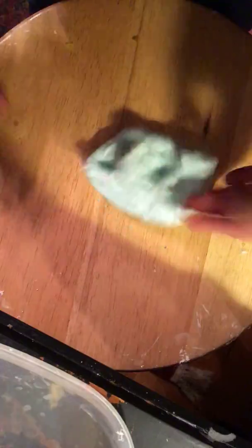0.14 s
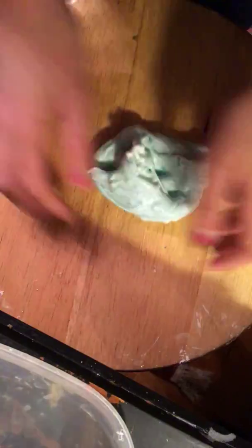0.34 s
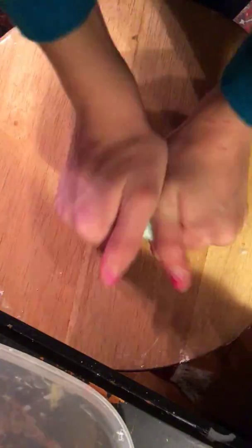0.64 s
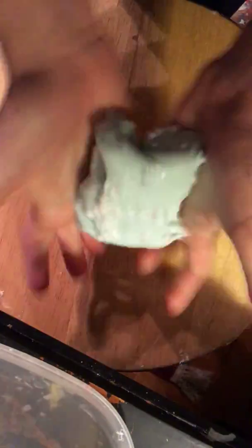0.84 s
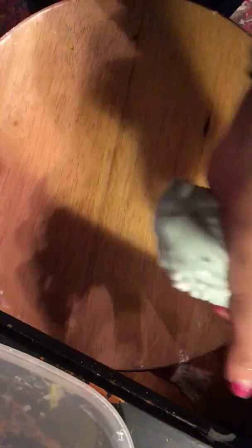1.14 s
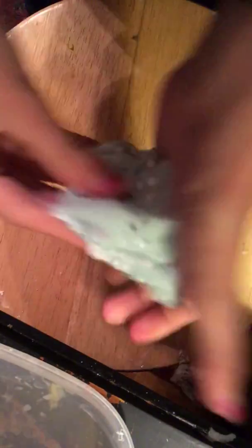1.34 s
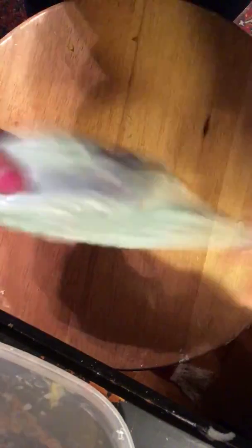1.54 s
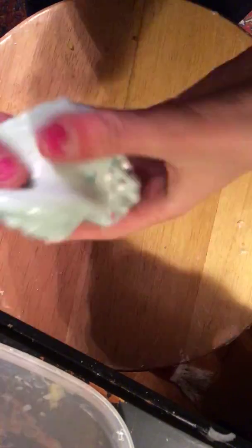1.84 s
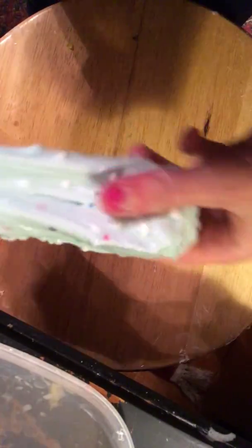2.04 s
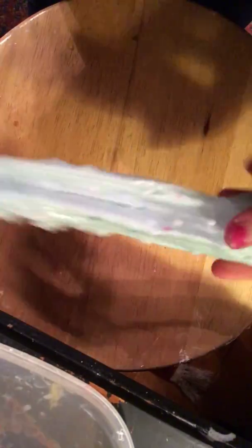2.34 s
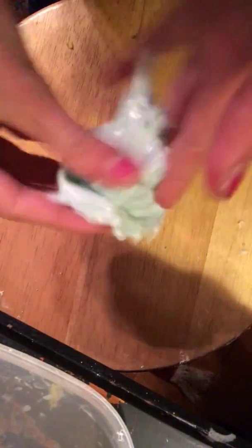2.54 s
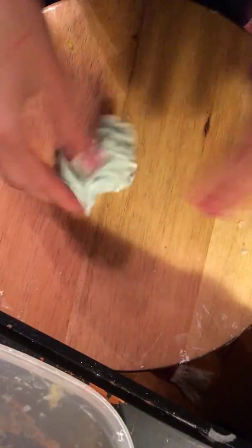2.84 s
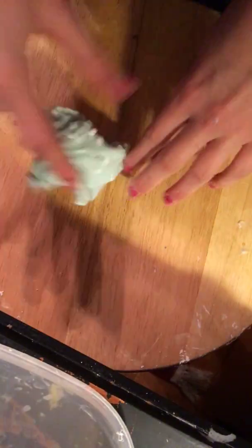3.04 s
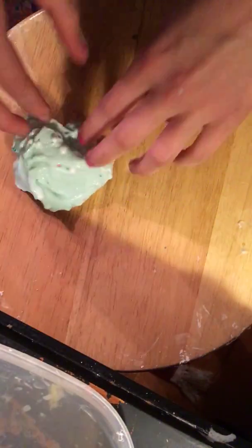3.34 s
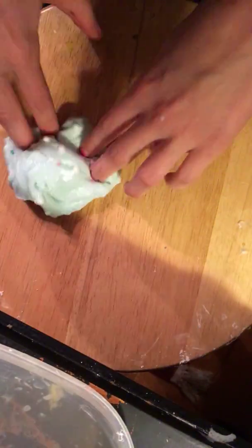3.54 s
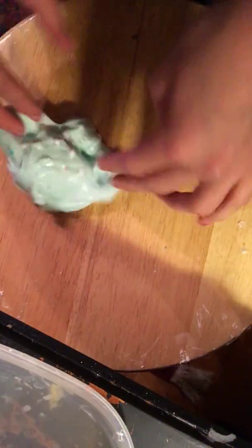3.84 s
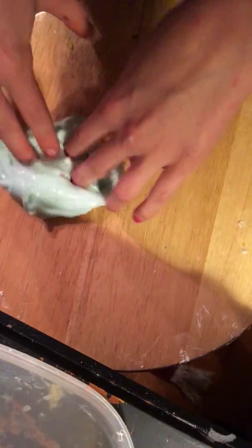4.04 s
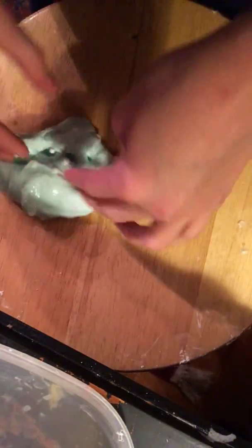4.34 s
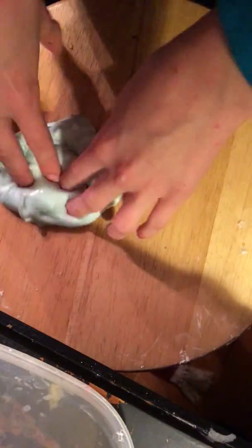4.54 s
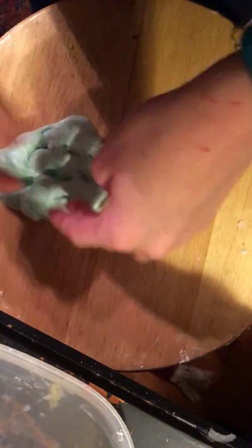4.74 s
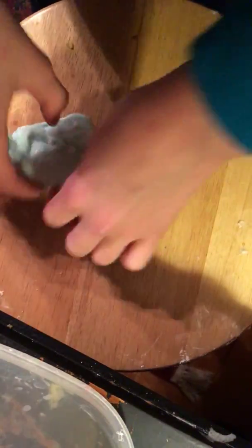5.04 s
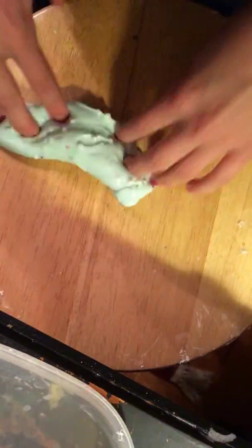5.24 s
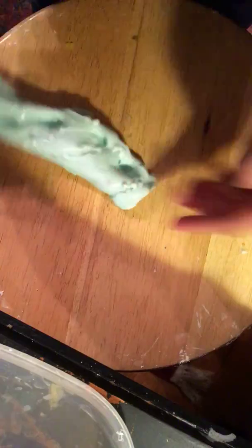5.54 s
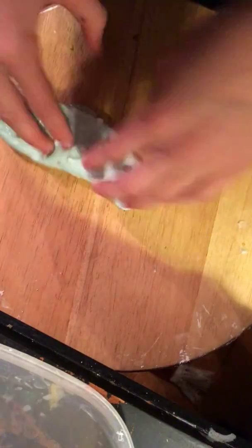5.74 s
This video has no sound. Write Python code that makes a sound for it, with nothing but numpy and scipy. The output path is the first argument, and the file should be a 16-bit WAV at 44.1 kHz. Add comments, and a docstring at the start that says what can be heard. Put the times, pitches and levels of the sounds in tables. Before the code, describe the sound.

Wet, sticky slime is kneaded by hand on a wooden board, with sharp bubble pops, crackles, soft squelches and dull thumps in a quiet room.

```python
"""Bright wet pops and sticky crackle come first, then squishes, rubs and thumps on wood in a quiet room.
Wet slime with beads is kneaded on a wooden table top under a phone microphone.
Trapped air bursts as filtered noise bursts; wet holes ring as sagging sines; peeling skin clicks and fizzes.
Pressing hands, fingertips and wet holes shake a sum of table modes.
Behind lie a noise hush, faint wavering tones, flutters of stirred air and the room's answer."""
import sys
import numpy as np
from scipy import signal
from scipy.fft import rfft, irfft, next_fast_len
from scipy.io import wavfile
from scipy.ndimage import map_coordinates

SR = 44100
rng = np.random.default_rng(int(sys.argv[2]) if len(sys.argv) > 2 else 0)


def bounce(signal):
    """Save signal as a 16-bit WAV file at the path given by the first command-line argument."""
    frames = np.transpose(np.atleast_2d(signal))
    limited = np.clip(frames, -1, 1)
    pcm = np.round(limited * 32767).astype(np.int16)
    wavfile.write(sys.argv[1], SR, pcm)


def ratio_of_db(decibels):
    """Turn decibels (scalar or array-like) into linear amplitude factors; 0 dB maps to 1."""
    return 10 ** (np.asarray(decibels, float) / 20)


N = 260441  # samples


def unit(x):
    """Scaled to rms 1."""
    return x / np.sqrt(np.mean(x ** 2) + 1e-20)


def noise():
    """White noise over the whole scene."""
    return rng.standard_normal(N)


def along(points, hz):
    """(freq_hz, value) points read on a log frequency axis."""
    f, v = np.transpose(points)
    return np.interp(np.log(hz + 1), np.log(f + 1), v)


def filtered(x, response):
    """x shaped by a (complex) response of frequency in Hz."""
    m = next_fast_len(len(x) + 8192)
    return irfft(rfft(x, m) * response(np.fft.rfftfreq(m, 1 / SR)), m)[:len(x)]


def coloured(x, spectrum):
    """x given a spectrum of (freq_hz, gain_db) points, rms 1."""
    return unit(filtered(x, lambda f: ratio_of_db(along(spectrum, f))))


def resonance(f, hz, width_hz):
    """A causal resonance of peak gain 1."""
    return 1j * f * width_hz / (hz * hz - f * f + 1j * f * width_hz)


def wobble(knots_per_s):
    """A smooth random curve."""
    return map_coordinates(rng.standard_normal(N // 100), [np.arange(N) * knots_per_s / SR])


def grainy(per_s, spread_db, grain_db, grain_ms):
    """Noise with short random spurts of very uneven size on it, rms 1."""
    chance, size = rng.random((2, N))
    starts = (chance < per_s / SR) * ratio_of_db(-spread_db * np.log(size + 0.037))
    envelope = signal.lfilter([1], [1, -np.exp(-1000 / (grain_ms * SR))], starts)
    spurts = envelope * noise()
    return unit(noise() + ratio_of_db(grain_db) * unit(spurts))


def bubbles(count, hz, cycles, spread_db):
    """Tiny pockets of air shifting in the mass: scattered damped tones a few cycles long, rms 1."""
    when, size = rng.random((2, count, 1))
    pitch_hz = hz * np.exp(0.524 * rng.standard_normal((count, 1)))
    k = np.arange(SR // 40)
    phase = pitch_hz * k / SR  # in cycles
    envelope = np.exp(-phase / cycles) * (1 - np.exp(-phase))
    grains = ratio_of_db(-spread_db * np.log(size + 0.0043)) * envelope * np.sin(2 * np.pi * phase)
    places = (when * N).astype(int) + k
    return unit(np.bincount(places.ravel(), grains.ravel())[:N])


def swells(peak_s, db, rise_s, fade_s):
    """Gain of overlapping gestures, each gaining 20 dB over its rise and losing 20 dB over its fade."""
    t, power = np.arange(0, N + 64, 32) / SR, 0
    for s, level_db, up_s, down_s in np.broadcast(peak_s, db, rise_s, fade_s):
        drop_db = 20 * np.maximum((s - t) / up_s, (t - s) / down_s)
        power = power + ratio_of_db(level_db - drop_db) ** 2
    return np.interp(np.arange(N) / SR, t, np.sqrt(power))


def add_at(out, start_s, sound):
    """Adds a sound to out from a given time."""
    out[round(start_s * SR):][:len(sound)] += sound


# room noise spectrum, relative: freq_hz, gain_db
HUSH_SPECTRUM = [(18, -24), (30, -7.5), (70, 2), (118, -1.5), (171, -21), (235, -4.5), (467, -14.5),
                 (904, -20.5), (1240, -18.5), (2050, -22.5), (7670, -30.5), (8310, -28.5), (12000, -31),
                 (15000, -31), (16500, -30.5), (18000, -64.5)]


def hush():
    """Room hush: noise of fixed colour and slightly wavering level."""
    level_db = -66
    return ratio_of_db(level_db + 0.61 * wobble(12)) * coloured(noise(), HUSH_SPECTRUM)


# faint wavering tones elsewhere in the room, before a shared waver in level:
# start_s, length_s, pitch_hz, level_db
TONES = [(1.21, .06, 1280, -68), (1.75, .08, 5750, -66), (1.75, .08, 3340, -67), (1.8, .1, 2800, -73),
         (1.23, .13, 780, -66), (2.22, .06, 1070, -72), (4.06, .07, 2550, -69), (2.04, .14, 1290, -69),
         (2.26, .13, 1310, -66), (3.56, .12, 1260, -69), (5.46, .07, 4700, -73), (5.84, .065, 6900, -69)]


def tones():
    """Short faint tones that swell, waver, fade and sag a little."""
    out = np.zeros(N + SR)
    for start_s, length_s, hz, db in TONES:
        t = np.arange(round(length_s * SR)) / SR
        drift = np.cumsum(rng.standard_normal(len(t))) * (.07 + hz / 120000)  # the higher, the rougher
        tone = np.sin(2 * np.pi * hz * t * (1 - 0.142 * t) + drift)
        add_at(out, start_s, ratio_of_db(db) * np.sin(np.pi * t / length_s) * tone)
    return out[:N] * ratio_of_db(3.5 * wobble(45))


# air stirred by the hands sweeping past the microphone: peak_s, level_db, fade_s
WAFTS = [(.32, -55, 0.29), (2.2, -62, 0.082), (2.65, -62, 0.062), (3.06, -56, 0.13)]


def wafts():
    """Brief deep flutters of moving air: noise through a low resonance applied twice."""
    hz, width_hz = 61.4, 42
    peak_s, db, fade_s = np.transpose(WAFTS)
    flutter = unit(filtered(noise(), lambda f: resonance(f, hz, width_hz) ** 2))
    return swells(peak_s, db, 0.33 * fade_s, fade_s) * flutter


# reverberation: freq_hz, t60_s
ROOM_DECAY = [(200, 0.19), (1500, 0.46), (6000, 0.017), (15000, 0.032)]


def room(x):
    """Each frequency of the room's answer dies at its own speed; every fifth of a second gets a new tail."""
    out, step = np.zeros(N + 2 * SR), SR // 5
    for start in range(0, N, step):
        hz, t, z = signal.stft(rng.standard_normal(SR // 3), SR, nperseg=256)
        decay = ratio_of_db(-60 * t / along(ROOM_DECAY, hz)[:, None])
        tail = signal.istft(z * decay, SR, nperseg=256)[1]
        wet = signal.fftconvolve(x[start:start + step], tail / np.linalg.norm(tail))
        out[start + SR // 200:][:len(wet)] += wet  # 5 ms later
    return out[:N]


# modes of the wooden top: freq_hz, width_hz, mid_board_db, near_rim_db
TABLE_MODES = [(135, 36, -1, -10), (203, 11, 8, -2), (259, 22, 1, -4), (329, 22, -14, 9),
               (385, 60, -13, -3), (600, 750, -27, -21), (731, 34, -23.5, -8.5), (1044, 110, -35.5, -23.5),
               (1410, 47, -20, -35), (1741, 26, -37, -16)]


def table_top(f, rim):
    """Sum of the modes of the wooden top, pressed between mid-board (0) and rim (1)."""
    total = 0
    for k, (hz, width_hz, mid_db, rim_db) in enumerate(TABLE_MODES):
        gain = ratio_of_db(mid_db + rim * (rim_db - mid_db))
        total = total + (-1) ** k * gain * resonance(f, hz, width_hz)
    return total


# steady work of the hands between gestures: time_s, effort_db, rim_share (0-1)
EFFORT = [(0.0, -57, 0.96), (.38, -69, 0), (.76, -71.5, 0.11), (1.2, -65, 0.27), (1.5, -64, 0.08),
          (1.75, -66, 0.1), (2.4, -71.5, 0.2), (2.8, -78, 0.1), (3.33, -65, 0.15), (3.42, -56, 0.26),
          (3.83, -57, 0.4), (4.2, -54.5, 0.32), (4.31, -52.5, 0.67), (4.5, -51.5, 0.9), (4.78, -51, 0.63),
          (4.98, -60, 0.11), (5.2, -62, 0.4), (5.45, -67.5, 0.19), (5.9, -66, 0.37)]


def effort():
    """Steady effort in dB and the share of the pressure near the table rim, per sample."""
    s, *columns = np.transpose(EFFORT)
    return [np.interp(np.arange(N) / SR, s, c) for c in columns]


# skin sliding on wood, relative spectrum: freq_hz, gain_db
RUB_SPECTRUM = [(880, -39), (1500, -2), (2320, -3.5), (2820, -5.5), (4580, -2.5), (6800, -9), (9000, -9),
                (11700, -49.5), (19800, -120)]
# slides: peak_s, hiss_db, fade_s
RUBS = [(0.254, -50, 0.13), (.92, -57.5, 0.056), (1.82, -68.5, 0.32), (4.09, -65.5, 0.066),
        (4.145, -66, 0.042), (4.194, -54.5, 0.022), (4.23, -63, .05), (4.28, -59, 0.074),
        (4.35, -69, 0.061), (4.43, -57, 0.11), (4.68, -66.5, 0.1), (4.84, -58, 0.092),
        (5.615, -59.5, 0.091), (5.89, -64.5, 0.059)]


def sliding():
    """Palms rub the wood: grainy coloured hiss, over a faint one that follows the effort."""
    rest_re_effort_db = -22
    peak_s, db, fade_s = np.transpose(RUBS)
    gain = np.hypot(ratio_of_db(effort()[0] + rest_re_effort_db), swells(peak_s, db, fade_s, fade_s))
    return gain * coloured(grainy(110, 3.2, 2.07, 8.0), RUB_SPECTRUM)


# pushes into the mass, also played by squishing(): peak_s, pressure_db, squish_re_pressure_db, fade_s
KNEADS = [(.13, -64, 7.5, 0.15), (0.248, -44, -5.5, 0.12), (.55, -60.5, -9.5, 0.47), (.92, -63.5, -5, 0.33),
          (1.48, -59, -18, 0.062), (1.68, -61.5, -26, 0.2), (1.82, -55.5, -8, 0.2), (2.55, -62, -12, 0.28),
          (3.031, -52, -19, 0.34), (3.4, -63, 4, 0.049), (3.61, -70, 5.5, 0.17), (3.862, -53.5, -8.5, 0.12),
          (4.01, -56.5, -26, .15), (4.12, -49, -29, 0.11), (4.21, -48, -13, 0.14), (4.389, -50.5, -2, 0.14),
          (4.759, -42, -13, 0.016), (4.84, -60.5, 8.5, 0.083), (4.948, -42.5, -21, 0.062),
          (5.06, -52.5, -34, 0.046), (5.178, -47.5, -22, 0.054), (5.3, -57, -36.5, 0.13),
          (5.42, -49.5, -25, 0.17), (5.551, -44, -31, 0.023), (5.669, -46.5, -30, 0.081),
          (5.8, -56.5, -25, 0.2), (5.9, -70, -4, 0.12)]


def pressing():
    """Changing hand pressure drives the table: grainy noise through its modes at mid-board and rim."""
    rise_per_fade = 0.7
    effort_db, rim = effort()
    peak_s, db, _, fade_s = np.transpose(KNEADS)
    gain = np.hypot(ratio_of_db(effort_db), swells(peak_s, db, rise_per_fade * fade_s, fade_s))
    mid, edge = [unit(filtered(grainy(44, 4.0, -5, 9.5), lambda f: table_top(f, place))) for place in (0, 1)]
    press = np.sqrt(1 - rim) * mid + np.sqrt(rim) * edge
    return gain * ratio_of_db(0.4 * wobble(35)) * press


# squishing mass, relative spectrum: freq_hz, gain_db
SQUISH_SPECTRUM = [(300, -2), (500, 2.5), (780, 1.4), (930, -5), (1260, 3), (1750, -3), (3000, 0),
                   (5000, -19)]


def squishing():
    """The pushed mass shifts its air pockets: bubble tones and noise in uneven lumps."""
    rest_re_effort_db = -10.5
    lead, rise, linger = 0.069, 0.53, 1.4  # in fade times of the push; the squish peaks earlier
    peak_s, db, squish_db, fade_s = np.transpose(KNEADS)
    pushes = swells(peak_s - lead * fade_s, db + squish_db, rise * fade_s, linger * fade_s)
    gain = np.hypot(ratio_of_db(effort()[0] + rest_re_effort_db), pushes)
    mass = bubbles(count=5000, hz=1050, cycles=5.8, spread_db=1.5) + 0.76 * noise()
    return gain * ratio_of_db(3.05 * wobble(35)) * coloured(mass, SQUISH_SPECTRUM)


# peeling skin, relative spectrum: freq_hz, gain_db
PEEL_SPECTRUM = [(1760, -30), (3000, -13), (3850, -13), (5270, -12), (7580, -11.5), (8440, -3),
                 (12800, -6.5), (15100, 3.5), (16200, 4.5), (18000, -59.5)]
# sticky skin leaving the fingers: peak_s, crackle_db, rise_s, fade_s, wet_smoothness (0-1)
PEELS = [(0.112, -43, 0.0075, 0.024, 0.6), (0.14, -26.5, 0.0018, 0.0098, 0.8),
         (.22, -43.5, 0.12, 0.09, 0.87), (.43, -66, .06, 0.15, 1), (.58, -58, 0.036, 0.28, 0.3),
         (.683, -54.5, 0.22, 0.17, 0.1), (.913, -46.5, 0.097, 0.043, 0.7), (.985, -63, 0.19, 0.046, 0.1),
         (1.176, -52, 0.082, 0.011, 0.23), (1.457, -55, 0.095, 0.099, 0.3), (1.55, -52, 0.078, 0.074, 0),
         (1.611, -44.5, 0.063, 0.047, 0), (1.649, -46, 0.062, 0.018, 0.2), (2.065, -65, 0.14, 0.028, 0.2),
         (2.14, -63.5, 0.036, 0.1, 0.3), (2.29, -72, 0.034, 0.092, .05), (2.5, -66, 0.083, 0.17, 0.5),
         (2.594, -55.5, 0.014, .11, 0), (2.704, -58.5, 0.1, 0.096, 0.15), (2.78, -57, 0.036, 0.023, 0.3),
         (2.963, -62, 0.14, 0.11, 0.4), (3.12, -64, 0.21, 0.092, 0.05), (3.219, -60, 0.036, 0.017, 0.04),
         (3.76, -64.5, 0.22, 0.12, 0), (3.869, -48.5, 0.02, 0.086, 0.5), (4.18, -57, 0.09, 0.45, 0.02),
         (4.405, -44.5, .01, 0.066, 0.2), (4.8, -52, 0.029, 0.031, 0.1), (4.828, -36.5, 0.013, 0.039, 0.15),
         (5.557, -44, 0.004, 0.024, 0.6), (5.601, -42.5, 0.016, 0.049, 0.4)]


def peeling():
    """Sticky skin peels off in tiny clicks; the wetter, the more of its power is smooth fizz."""
    idle_db = -76
    peak_s, db, rise_s, fade_s, wet = np.transpose(PEELS)
    wet = np.clip(wet, .01, .99)
    clicking = swells(peak_s, db + 10 * np.log10(1 - wet), rise_s, fade_s)
    clicking = np.hypot(ratio_of_db(idle_db), clicking) * ratio_of_db(4.35 * wobble(32))
    fizzing = swells(peak_s, db + 10 * np.log10(wet), rise_s, fade_s) * ratio_of_db(0.77 * wobble(43))
    clicks = coloured(grainy(300, 2.5, 2., .35), PEEL_SPECTRUM)
    fizz = coloured(noise(), PEEL_SPECTRUM)
    return clicking * clicks + fizzing * fizz


# soft finger blows on the table, before a shared trim: start_s, push_db, contact_ms (held to 0.3-2.5)
THUMPS = [(0.202, -18.5, 0.59), (.915, -29.5, 0.69), (3.015, -19, 1.03), (3.047, -19, 1.4),
          (4.094, -21.5, 0.27), (4.165, -23.5, 0.81), (4.302, -27, .5), (4.53, -30, 0.69),
          (4.571, -32, 0.45), (4.604, -35, 0.4), (4.628, -28, .5), (4.656, -33.5, 0.46), (4.68, -30.5, .5),
          (4.745, -19.5, 0.26), (5.045, -37, 0.9), (5.16, -22, 0.24), (5.271, -29, 0.67),
          (5.407, -28.5, 0.24), (5.784, -33, 0.55)]


def thumps():
    """A fingertip lands softly: a rounded push into the table; a longer contact reaches only deep modes."""
    trim_db = -1.5
    push, t = np.zeros(N + SR), np.arange(SR // 40) / SR
    for start_s, db, contact_ms in THUMPS:
        u = 1000 * t / np.clip(contact_ms, .3, 2.5)
        add_at(push, start_s, ratio_of_db(db + trim_db) * u ** 2 * np.exp(-u))
    push, rim = push[:N], effort()[1]
    mid = filtered((1 - rim) * push, lambda f: table_top(f, 0))
    edge = filtered(rim * push, lambda f: table_top(f, 1))
    return mid + edge


# wet holes opening and closing, before a shared trim: start_s, level_db, hollow_hz, t60_ms
SQUELCHES = [(0.1402, -40.5, 1720, 130), (0.2386, -39, 1290, 65), (0.2488, -41, 1153, 77),
             (0.9065, -46, 1880, 68), (0.9179, -25.5, 1700, 15), (0.93, -53, 1700, 250),
             (1.762, -49, 763, 210), (1.771, -44.5, 545, 290), (1.86, -50.5, 740, 160),
             (3.3979, -38.5, 748, 21), (3.424, -50, 1090, 30), (3.464, -44, 1200, 27),
             (3.589, -51, 1300, 260), (3.599, -49.5, 1730, 90), (3.87, -42.5, 1640, 110),
             (3.8798, -34.5, 1310, 15), (4.1912, -44, 1670, 35), (4.2038, -39, 610, 75),
             (4.39, -34, 1360, 13), (4.4015, -29.5, 1113, 54), (4.4085, -32.5, 1653, 62),
             (4.4548, -35, 660, 51), (4.6348, -30, 720, 12.3), (4.7612, -48, 750, 59),
             (4.7981, -37.5, 697, 87), (4.8263, -22, 1003, 24), (4.8317, -35.5, 787, 140),
             (4.8435, -22.5, 1050, 17), (4.9412, -39, 737, 46), (5.554, -9, 1100, 2.34),
             (5.6005, -35, 1360, 47), (5.619, -45.5, 1460, 73), (5.6683, -43.5, 860, 27)]


def squelches():
    """Air in a wet hole rings briefly, its pitch sagging as the hole widens; each also nudges the table."""
    trim_db, table_db = -6.0, -2.0
    sag_per_s = 0.74  # share of the starting pitch lost
    out, t = np.zeros(N + SR), np.arange(SR // 10) / SR
    for start_s, db, hollow_hz, t60_ms in SQUELCHES:
        drift = np.cumsum(rng.standard_normal(len(t))) * hollow_hz / 24000  # unsteady phase of a soft cavity
        ring = np.sin(2 * np.pi * hollow_hz * t * (1 - sag_per_s * t / 2) + drift)
        envelope = ratio_of_db(db + trim_db - 60000 * t / t60_ms) * (1 - np.exp(-t / 0.00036))
        add_at(out, start_s, envelope * ring)
    holes = out[:N]
    return holes + ratio_of_db(table_db) * filtered(holes, lambda f: table_top(f, .6))


# air pockets bursting; the body gets a shared lift: start_s, crack_peak_db, crack_hz, body_re_crack_db, t60_ms
POPS = [(0.108, -26, 11300, -30, 14), (0.1391, -13.5, 13600, -7.5, 3.5), (0.182, -25.5, 12200, -24, 3),
        (0.673, -30, 13700, -20, 8), (0.7274, -35, 13100, -34, 4.4), (0.821, -46, 12000, -3, 9.3),
        (0.8868, -30, 13600, -34, 3.9), (0.9, -29, 11300, -22, 6.2), (0.9049, -36, 13900, -25, 4.9),
        (0.9186, -36.5, 10400, -1, 23), (1.087, -35.5, 11400, -6.5, 9), (1.165, -36.5, 12900, -30, 7.3),
        (1.454, -32, 12100, -28, 4.4), (1.478, -39, 13800, -29, 6.3), (1.5359, -24.5, 14100, -36, 4.4),
        (1.5442, -18, 14200, -26, 2.5), (1.5488, -22.5, 13000, -19, 3.6), (1.588, -23.5, 14100, -15, 3.2),
        (1.5934, -18, 11300, -28, 1.2), (1.597, -22, 13900, -33, 2.6), (1.611, -19, 13600, -20, 2.7),
        (1.62, -18, 13200, -18, 2.8), (1.655, -33.5, 13100, -11, 7.7), (1.972, -44, 13000, -28, 3.8),
        (2.03, -32.5, 14700, -31, 4.4), (2.136, -38, 10600, -32, 3), (2.2782, -41.5, 9200, -25, 6.6),
        (2.6, -34, 14900, -14, 9.5), (2.6917, -35, 13900, -20, 4.7), (2.7135, -20.5, 13300, -47, 4.6),
        (2.782, -34.5, 12400, -27, 13), (2.9632, -33, 11000, -24.5, 19), (3.371, -43, 8300, -7.5, 22),
        (3.7294, -43, 13100, -32, 5.9), (3.756, -44.5, 13700, -23.5, 6.7), (3.772, -43.5, 10500, -30, 5.1),
        (3.835, -19, 12100, -23, 12), (3.8693, -1.5, 11400, -28.5, 1.1), (4.1836, -37, 11200, -8, 11),
        (4.2, -43, 11500, -25, 4), (4.352, -43, 11500, -30, 5), (4.365, -31.5, 12300, -13, 4.7),
        (4.4022, -12, 11200, -11.5, 11), (4.4373, -33.5, 9400, -2.5, 5.8), (4.7985, -3, 13900, -24, 4.4),
        (4.8254, -2.5, 12500, -24.5, 6.4), (4.8432, -40, 13200, -17, 4.8), (4.939, -50.5, 10000, -1, 5.3),
        (5.1471, -40, 11000, -18, 3.7), (5.351, -45, 9700, -9.5, 4.3), (5.408, -49, 9000, -5, 7.4),
        (5.554, -1, 14600, -18, 0.67), (5.5988, -22, 12700, -9, 4.1), (5.6001, -13.5, 12100, -23, 26),
        (5.6022, -15, 13000, -9, 4.6)]


def pops():
    """Each burst: a short crack high in the treble with a ragged after-spit, and a duller body."""
    body_lift_db = 0.5
    out, t = np.zeros(N + SR), np.arange(SR // 25) / SR
    for start_s, db, crack_hz, body_db, t60_ms in POPS:
        decay = ratio_of_db(-60000 * t / t60_ms) + ratio_of_db(-19 - 60 * t / .014)  # burst, then after-spit
        spit = decay * (1 - np.exp(-t / .00008))
        a, b = spit * rng.standard_normal((2, len(t)))
        a[4] += 13 / t60_ms  # a quick burst opens with one sharp pressure step, a slow tear hardly
        b[4] += 11 / t60_ms

        def crack_response(f):
            peak = resonance(f, crack_hz, 5800) * (f / crack_hz) ** 1.2
            return peak / (1 + (7900 / (f + 1)) ** 24) / (1 + (f / 16800) ** 24)

        crack = filtered(a, crack_response)
        body = filtered(b, lambda f: resonance(f, 5800, 8000) / (1 + (f / 7600) ** 8))
        crack /= np.abs(crack).max()
        body /= np.abs(body).max()
        add_at(out, start_s, ratio_of_db(db) * (crack + ratio_of_db(body_db + body_lift_db) * body))
    return out[:N]


def scene():
    """Slime, hands and table close by, the room and its hush behind."""
    room_db = -19.5
    near = pops() + squelches() + thumps()
    hands = peeling() + squishing() + sliding() + pressing()
    behind = ratio_of_db(room_db) * room(near) + wafts() + tones() + hush()
    return (near + hands + behind)[None]


def band_limit(x):
    """A steep low-pass at the top of the band."""
    return signal.sosfilt(signal.butter(12, 16960, fs=SR, output="sos"), x)


def record(dry):
    """The microphone path drops the deepest bass and the top of the treble."""
    top_hz, edge_hz, above_top_db = 15820, 110, -22

    def microphone(f):
        edge_db = above_top_db * (1 + np.tanh((f - top_hz) / edge_hz)) / 2
        slope_db = np.maximum(f - top_hz, 0) / 50
        return ratio_of_db(edge_db - slope_db) / (1 + (42 / (f + 1)) ** 4)

    heard = filtered(dry[0], microphone)
    return band_limit(heard[None])


dry = scene()
out = record(dry)
bounce(out)
```